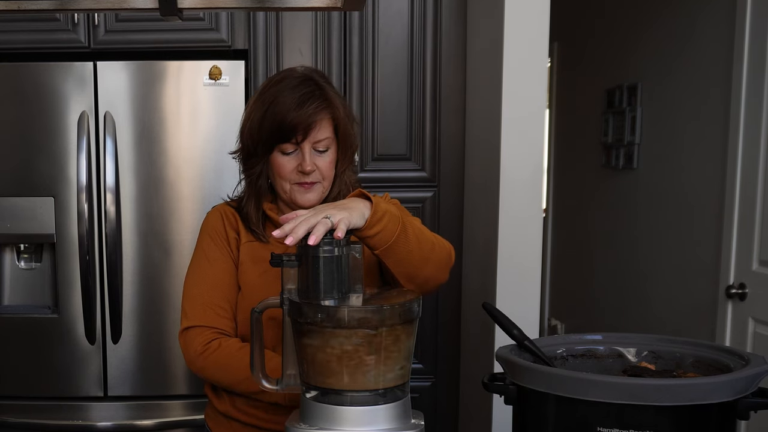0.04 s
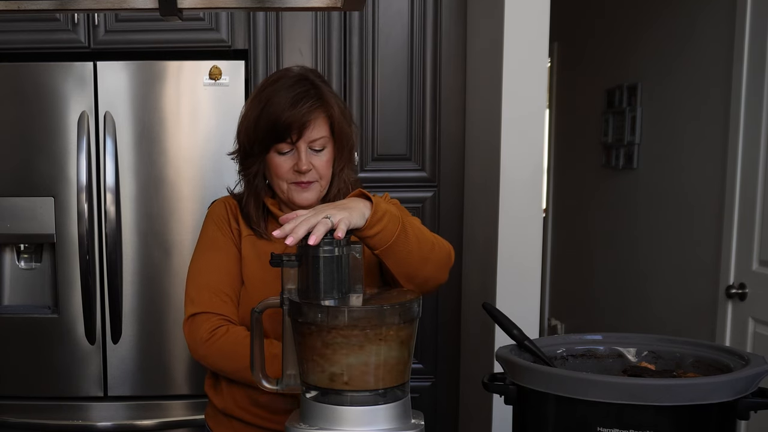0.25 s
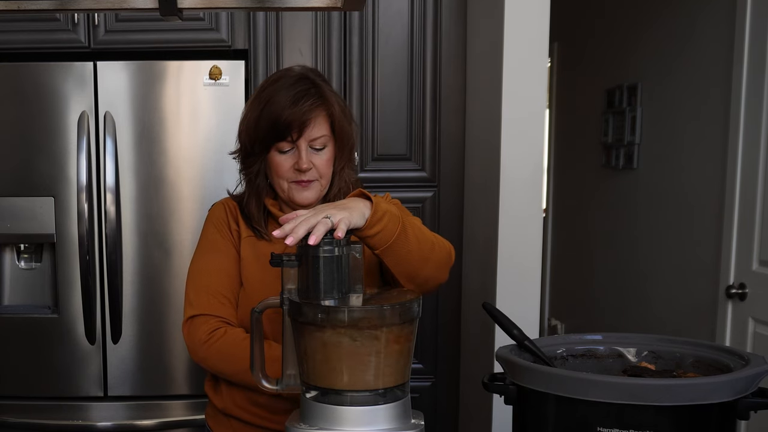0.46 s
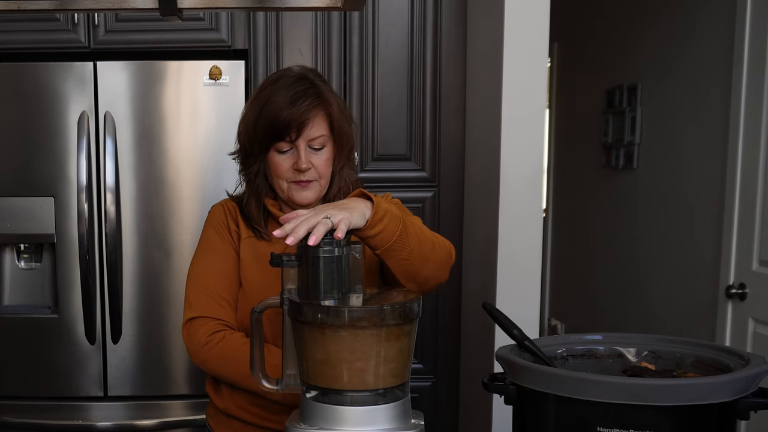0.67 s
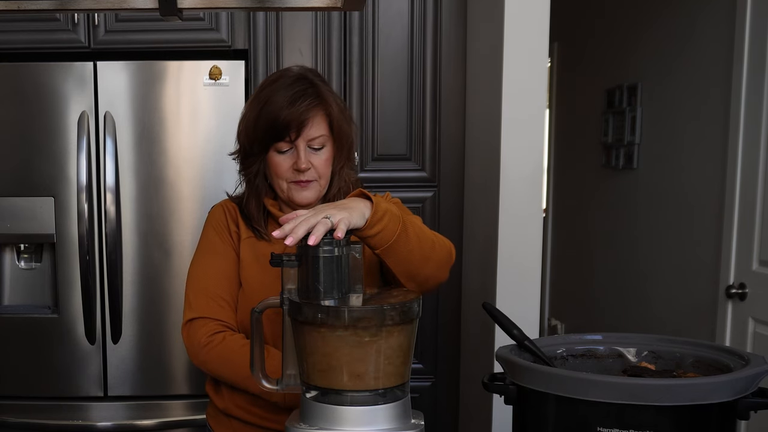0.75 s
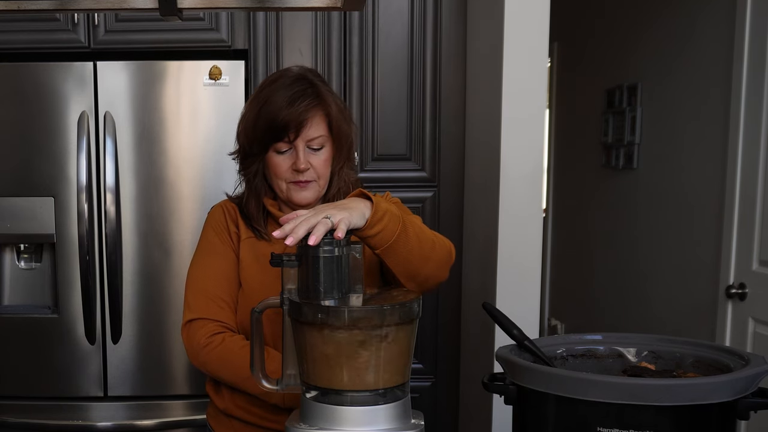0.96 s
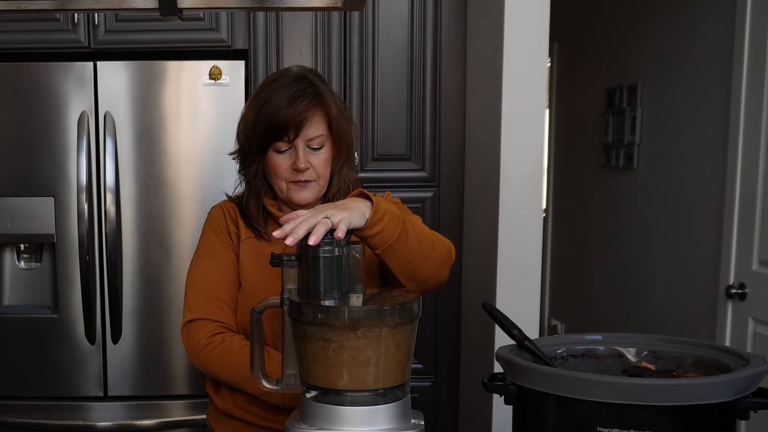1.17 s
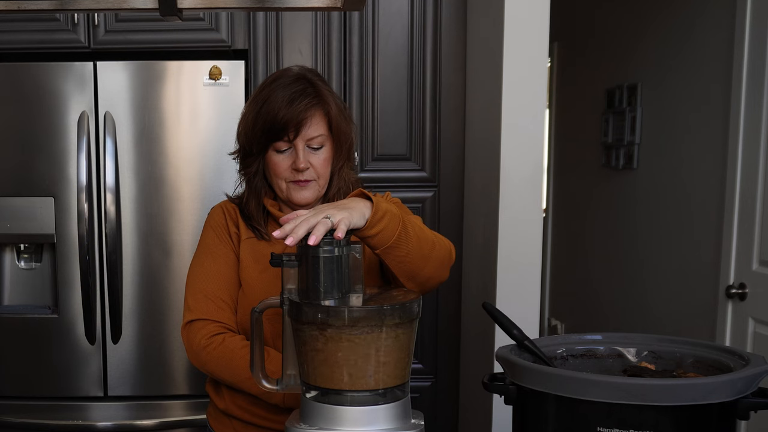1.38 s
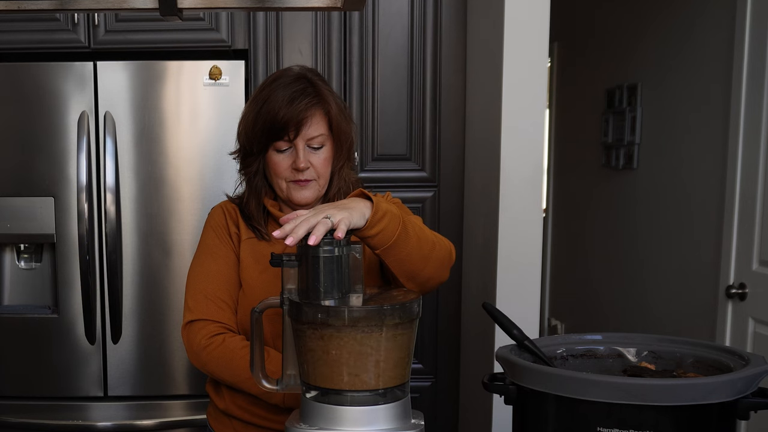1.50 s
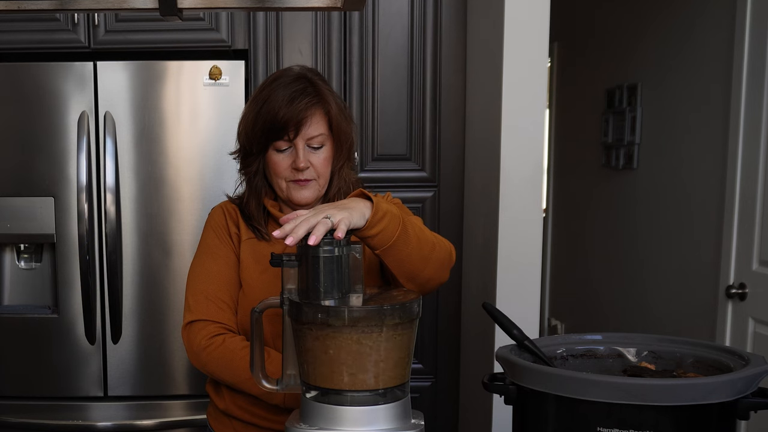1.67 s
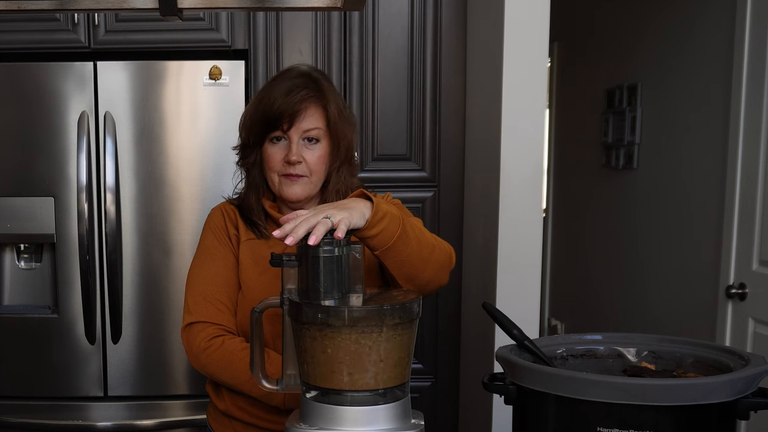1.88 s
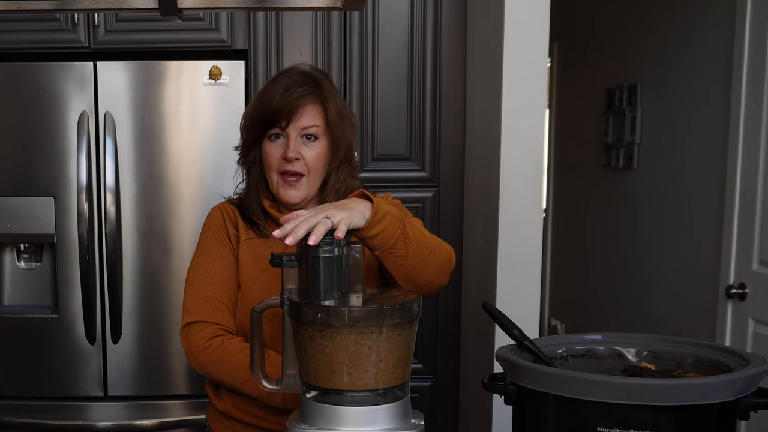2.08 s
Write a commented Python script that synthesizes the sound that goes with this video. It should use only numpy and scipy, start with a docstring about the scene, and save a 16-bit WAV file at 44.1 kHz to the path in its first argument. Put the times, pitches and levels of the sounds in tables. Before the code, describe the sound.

A food processor is already coasting, its rough whine sinking until about 0.17 s. A pulse of power brings a brief low hum and a fast rise, peaking in pitch and loudness around 0.5 s with gritty gear noise and rushing, churned food in a plastic bowl. From 0.7 s it slides steadily lower and softer, nearly gone by 2 s. A small bright tick with a short room tail comes at 2.09 s.

```python
"""A kitchen counter: a food processor, still coasting, is pulsed once more, winds up and runs down.
Gear teeth whine as rough noise bands at multiples of the mesh rate and scuff as dense tiny clicks.
Air and food rush as noise coloured by the plastic housing, and the bowl rumbles in narrow bands.
Thin hisses stand out at low speed, sines hum while the windings are powered,
and a bright tick of decaying sines with a noise wash sounds near the end."""
import sys
import numpy as np
from scipy import signal
from scipy.fft import rfft, irfft
from scipy.io import wavfile

SR = 44100
rng = np.random.default_rng(int(sys.argv[2]) if len(sys.argv) > 2 else 0)


def bounce(signal):
    """Save signal as a 16-bit WAV file at the path given by the first command-line argument."""
    frames = np.transpose(np.atleast_2d(signal))
    limited = np.clip(frames, -1, 1)
    pcm = np.round(limited * 32767).astype(np.int16)
    wavfile.write(sys.argv[1], SR, pcm)


def to_linear_factor(level_db):
    """Convert decibel levels (scalar or array-like) to linear amplitude factors."""
    exponent = np.asarray(level_db, float) / 20
    return 10 ** exponent


N = 94638

# gear mesh rate: [t/s, f/Hz]
MESH_RATE = [(0, 1045), (.165, 854.6), (.25, 1551), (.35, 1952), (.52, 2286), (.7, 1970), (1.0, 1485),
             (1.25, 1137), (1.5, 908.6), (1.75, 663.7), (2.0, 434), (2.15, 353.3)]
# fader moves of the drive, and of the rush within it: [t/s, level/dB, relative level/dB]
DRIVE_LEVELS = [(0, -36.5, -5.5), (.05, -37.5, -10), (.1, -38, -13), (.16, -39.5, -7.5), (.2, -35, -5),
                (.3, -33, -4.5), (.42, -30.5, 0), (.53, -27, -1), (.67, -29, 0), (.82, -30, -0.5),
                (.9, -31.5, -2), (1.0, -31.5, -3.5), (1.19, -35.5, -4), (1.4, -38, -7), (1.58, -39, -11.5),
                (1.8, -46.5, -14.5), (1.99, -51.5, -13), (2.15, -51.5, -19)]
# whine partials: [multiple of mesh rate, relative level/dB, spread/Hz, power of speed it grows with]
WHINE_PARTIALS = [(1, -3.5, 80, 1.72), (2, -7.5, 55, 0.92), (3, -16.5, 96, .6), (4, -17, 210, 1.5)]
# colour of the scuffing, before the housing: [f/Hz, relative level/dB]
SCUFF_COLOUR = [(35, -89), (60, -73), (146, -46), (678, -25.5), (836, -15.5), (1030, -18.5), (1210, -12),
                (1760, -15), (2440, -3.5), (3160, -10), (6820, -19.5), (7310, -26.5), (15800, -42)]
# colour of the rush, before the housing: [f/Hz, relative level/dB]
RUSH_COLOUR = [(24, -77), (40, -37), (596, -18), (747, -18), (1260, -12.5), (1470, -14), (1660, -3.5),
               (2420, -15), (3190, -2.5), (4640, -2), (5950, -12), (9110, -14), (15800, -31.5)]
# resonances of the plastic housing, and one dip: [f/Hz, width/Hz, lift/dB]
HOUSING_RESONANCES = [(718, 80, 4.5), (1170, 16, 5), (1445, 35, 8.5), (1503, 54, 12), (2000, 50, 10),
                      (2080, 44, 5), (2363, 140, 3.5), (2460, 40, 4.5), (2519, 43, 4), (2785, 105, 3.5),
                      (2971, 27, 10.5), (3697, 220, 3.5), (4230, 240, 6.5), (4605, 88, 5.5), (4800, 113, 5),
                      (5075, 150, 6.5), (6880, 38, 1), (11860, 430, -10)]
# bowl and counter, shaken by the churning: [f/Hz, width/Hz, level relative to the rush/dB]
BOWL_BANDS = [(238, 12.8, -33.5), (312.4, 19, -36.5), (45.6, 40, -41.5)]
# thin hisses within the drive: [f/Hz, width/Hz, relative level/dB]
SQUEAL_BANDS = [(6700, 90, -22.5), (769, 27, -22)]
# winding hum at switch-on, before its wobble: [f/Hz, level/dB]
HUM_TONES = [(121, -83), (242, -57.5), (363, -71.5)]
# snaps of the bright tick, before decay and bass cut: [t/s, level/dB]
TICK_SNAPS = [(2.0873, -33), (2.0881, -33), (2.0905, -40)]


def in_time(rows):
    """Automation curves: each column joined by straight lines in time."""
    times, *columns = np.transpose(rows)
    return [np.interp(np.arange(N) / SR, times, values) for values in columns]


def rms_one(x):
    """Scale a sound to rms 1."""
    return x / np.sqrt(np.mean(x ** 2) + 1e-20)


def drift(rate_hz):
    """Random wander of rms 1: white noise through two equal one-pole lowpasses."""
    pole = np.exp(-2 * np.pi * rate_hz / SR)
    warm_up = 20000  # samples thrown away while the filter settles
    noise = rng.standard_normal(N + warm_up)
    return rms_one(signal.lfilter([1], [1, -2 * pole, pole * pole], noise)[warm_up:])


def rough_tone(phase, spread_hz):
    """Narrow noise band of rms near 1: random wander on the cosine and sine of a carrier."""
    return drift(spread_hz) * np.cos(phase) + drift(spread_hz) * np.sin(phase)


def narrow_bands(rows):
    """Sum of narrow noise bands at fixed pitches."""
    t = np.arange(N) / SR
    return sum(to_linear_factor(db) * rough_tone(2 * np.pi * hz * t, width_hz) for hz, width_hz, db in rows)


def through_housing(x, colour=((30, 0), (20000, 0))):
    """Equalise by a colour curve, flat if none is given, and by the resonances of the housing."""
    hz = np.fft.rfftfreq(N, 1 / SR) + 1
    colour_hz, colour_db = np.transpose(colour)
    eq_db = np.interp(np.log(hz), np.log(colour_hz), colour_db)
    for peak_hz, width_hz, lift_db in HOUSING_RESONANCES:
        eq_db = eq_db + lift_db / (1 + (2 * (hz - peak_hz) / width_hz) ** 2)
    return irfft(rfft(x) * to_linear_factor(eq_db), N)


def patchy(x):
    """Overlapping octave bands swell and sink, each on its own."""
    depth_db, rate_hz = 0.14, 25
    octaves = np.log2(np.fft.rfftfreq(N, 1 / SR) + 1)
    spectrum = rfft(x)
    out = 0
    for centre in range(4, 15):
        share = np.clip(1 - np.abs(octaves - centre), 0, 1)
        out = out + irfft(spectrum * share, N) * to_linear_factor(depth_db * drift(rate_hz))
    return out


def hum():
    """Mains buzz of the windings: steady sines, strongest under starting load, then sagging."""
    on_s, off_s, sag_db_per_s = 0.165, 0.445, 37
    t = np.arange(N) / SR
    fade_in = np.clip((t - on_s) / 0.0092, 0, 1)
    fade_out = np.clip((off_s - t) / 0.05, 0, 1)
    tones = sum(to_linear_factor(db) * np.sqrt(2) * np.sin(2 * np.pi * hz * t) for hz, db in HUM_TONES)
    wobble_db = 1.0 * drift(9.6)
    return tones * fade_in * fade_out * to_linear_factor(-sag_db_per_s * (t - on_s) + wobble_db)


def tick():
    """Bright snaps, each two fast-decaying sines, then a noise wash from the walls."""
    low_hz, top_hz = 3850, 13800
    bright_hz, ring_hz, ring_db = 9350, 4300, -10
    wash_db, wash_t60_s = -47, 0.13  # wash level at its onset, before the bass cut
    t = np.arange(N) / SR
    out = np.zeros(N)
    for start_s, db in TICK_SNAPS:
        age = np.maximum(t - start_s, 0)
        snap = np.sin(2 * np.pi * bright_hz * age) * np.exp(-age / 0.00044)
        ring = np.sin(2 * np.pi * ring_hz * age) * np.exp(-age / 0.00092)
        out += to_linear_factor(db) * (snap + to_linear_factor(ring_db) * ring)
    age = t - TICK_SNAPS[0][0]
    band = signal.butter(2, [low_hz, top_hz], "band", fs=SR, output="sos")
    wash = rms_one(signal.sosfilt(band, rng.standard_normal(N)))
    decay = to_linear_factor(wash_db - 60 * np.maximum(age, 0) / wash_t60_s)
    out = out + wash * (age > 0) * decay
    return signal.sosfilt(signal.butter(2, low_hz, "high", fs=SR, output="sos"), out)


def squeal(mesh_hz):
    """Thin hisses at fixed pitches, a larger share of the sound when the drive is slow."""
    return narrow_bands(SQUEAL_BANDS) * (1.15 - mesh_hz / mesh_hz.max())


def rush(rush_db):
    """Air and churned food: smooth noise through the housing, with the shaken bowl under it."""
    air = rms_one(through_housing(rng.standard_normal(N), RUSH_COLOUR))
    return to_linear_factor(rush_db) * (air + narrow_bands(BOWL_BANDS))


def scuffing(mesh_hz):
    """Dense tiny contacts of uneven size ring the housing, more of them at speed."""
    idle_per_s, per_tooth, spread_db = 6000, 8.0, 1.5
    chance = (idle_per_s + per_tooth * mesh_hz) / SR
    sizes = to_linear_factor(spread_db * np.minimum(rng.exponential(1, N), 5)) * rng.choice([-1, 1], N)
    hits = sizes * (rng.random(N) < chance)
    even_hits = hits / np.sqrt(chance)  # denser hits get no louder
    return to_linear_factor(-2) * rms_one(through_housing(even_hits, SCUFF_COLOUR))


def whine(mesh_hz):
    """Uneven teeth smear each mesh partial into a narrow band that follows the speed."""
    teeth_passed = np.cumsum(mesh_hz) / SR
    speed = mesh_hz / mesh_hz.max()
    out = 0
    for multiple, db, spread_hz, power in WHINE_PARTIALS:
        band = rough_tone(2 * np.pi * multiple * teeth_passed, spread_hz)
        out = out + to_linear_factor(db) * speed ** power * band
    return through_housing(out)


def scene():
    """Drive noises share one shuddering fader; hum and tick sit beside them."""
    mesh_hz, = in_time(MESH_RATE)
    level_db, rush_db = in_time(DRIVE_LEVELS)
    churning = patchy(scuffing(mesh_hz) + rush(rush_db))
    drive = churning + to_linear_factor(-5.5) * whine(mesh_hz) + squeal(mesh_hz)
    shudder_db = 0.62 * drift(35.2)  # rms dB, rate in Hz
    mix = drive * to_linear_factor(level_db + shudder_db) + hum() + tick()
    return mix[None]  # one channel


def roll_off(x):
    """The treble ends steeply here."""
    return signal.sosfilt(signal.butter(12, 15940, fs=SR, output="sos"), x)


def record(dry):
    """The microphone rolls off the bass below 144 Hz."""
    bass_cut = signal.butter(2, 144, "high", fs=SR, output="sos")
    mix = signal.sosfilt(bass_cut, dry)
    return roll_off(mix)


dry = scene()
out = record(dry)
bounce(out)
```